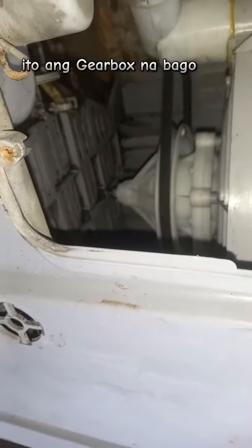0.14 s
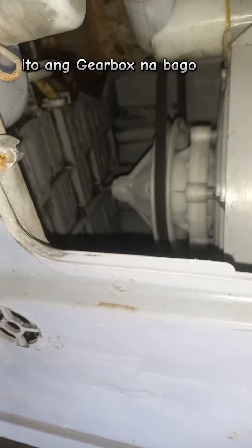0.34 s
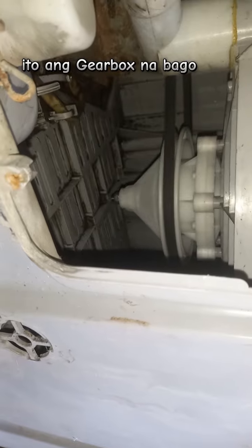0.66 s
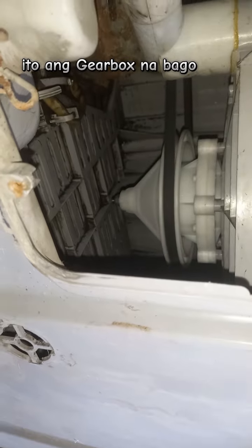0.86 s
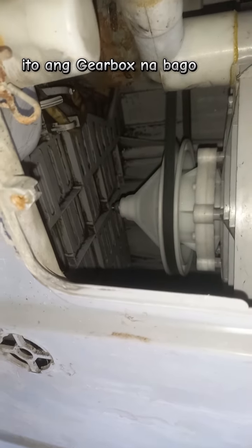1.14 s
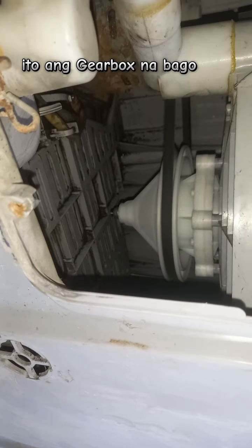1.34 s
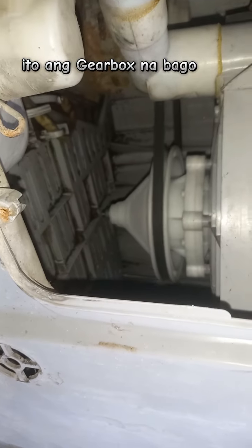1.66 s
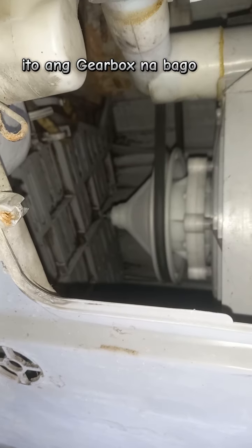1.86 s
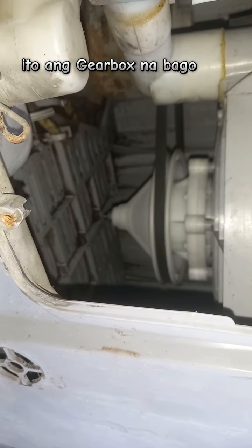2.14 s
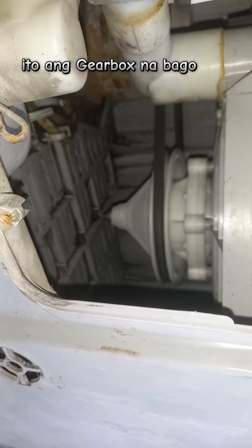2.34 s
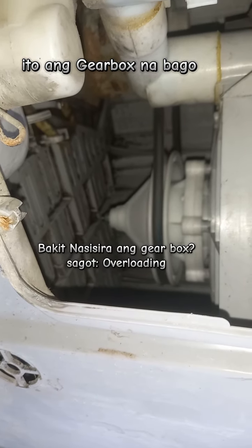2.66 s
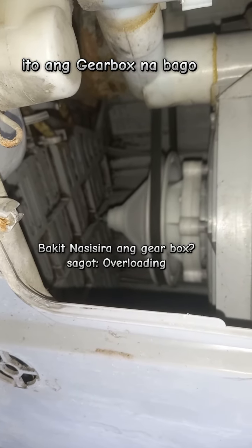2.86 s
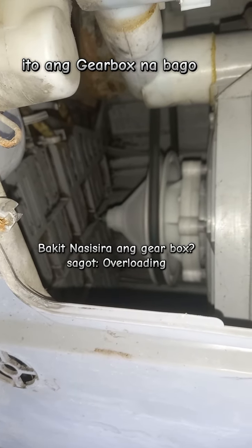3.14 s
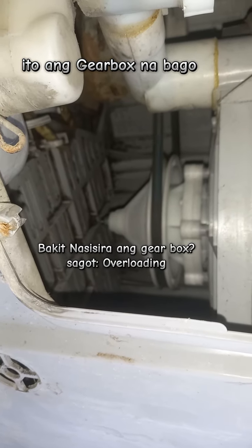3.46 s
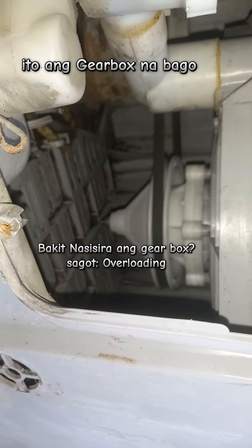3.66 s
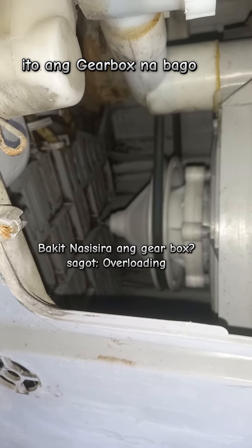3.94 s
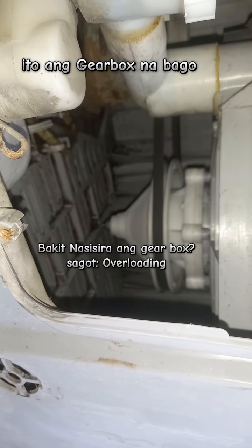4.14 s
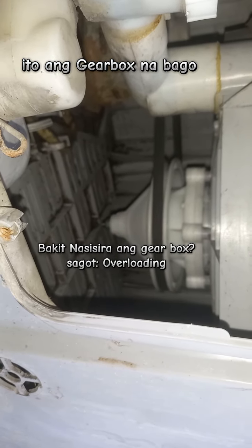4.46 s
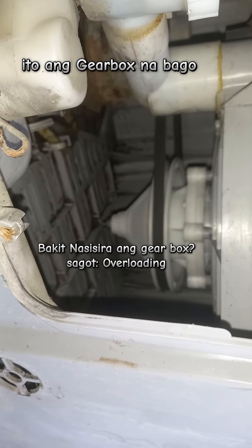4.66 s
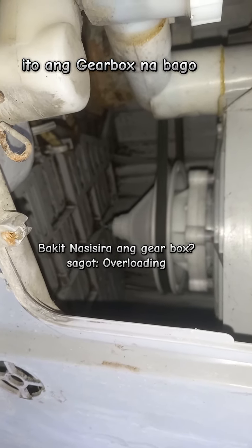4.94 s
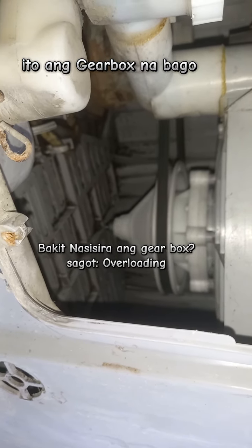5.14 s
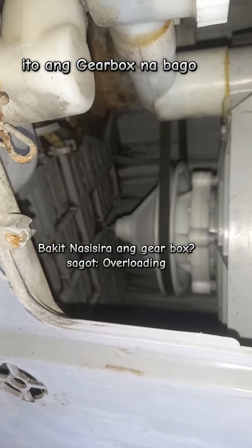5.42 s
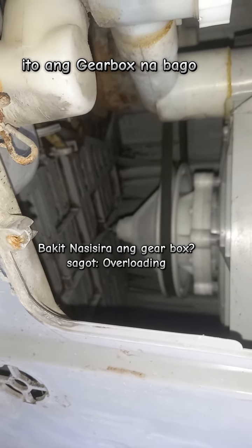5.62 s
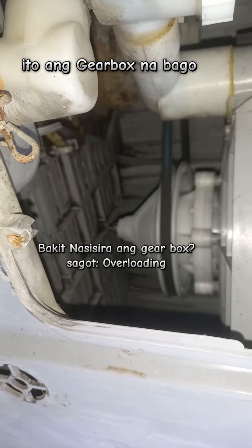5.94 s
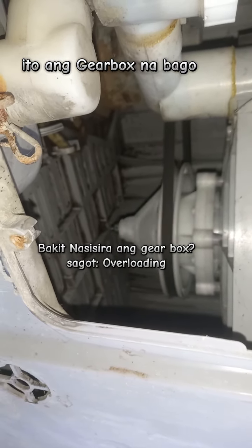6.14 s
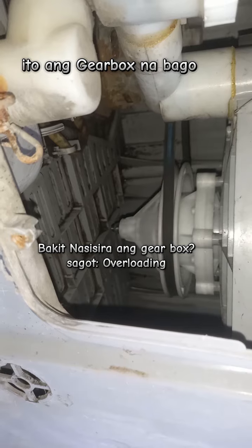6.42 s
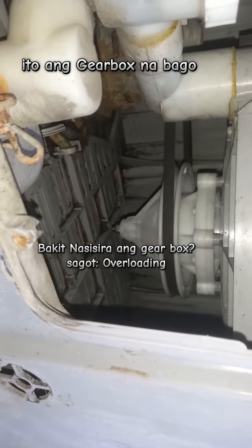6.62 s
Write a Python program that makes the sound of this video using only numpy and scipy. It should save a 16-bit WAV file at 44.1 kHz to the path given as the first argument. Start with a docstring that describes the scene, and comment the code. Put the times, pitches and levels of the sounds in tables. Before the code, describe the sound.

Close to the open motor bay of a twin-tub washer. From 0 to 0.7 seconds there is low cabinet rumble, faint settling water and several short, rising gurgles. At about 0.7 a tight cluster of hard, hollow clacks and a low thump engages the drive. The motor surges loudest near 0.9, then holds a deep hum around 120 hertz, with a rapid flutter, metallic frame buzz and a thin high whine. Water churns densely with bright hiss, small spits and occasional gurgles, notably at 0.9, 3.1, 3.5, 3.9 and 5.3. The stroke stays steady with slight swells until roughly 5.4, when a short squeak marks release and the hum drops away by 5.6. Water subsides into darker, quiet trickling over soft low rumble, with faint gurgles and small gritty squeaks around 5.9 and 6.4, ending near 6.8.

```python
"""Low cabinet rumble, a little water and stray gurgles open a twin-tub washer heard close to its motor bay.
The motor clacks in, hums at twice the mains rate with a beat once per turn, and buzzes in its frame.
Water churns, hisses and gurgles through one stroke, then settles under fading squeaks as the motor stops.
Hum and whine are drifting tones, clacks and buzz excite resonances, and rumble and water are patchy noise."""
import sys
import numpy as np
from scipy import signal
from scipy.fft import rfft, irfft, next_fast_len
from scipy.io import wavfile
from scipy.ndimage import uniform_filter1d

SR = 44100
rng = np.random.default_rng(int(sys.argv[2]) if len(sys.argv) > 2 else 0)


def transcribe(u):
    """Save the signal u as a 16-bit wav file named by the first command-line argument.

    u: samples, shape (n,) or (channels, n), limited to [-1, 1]; the rate is SR.
    q: integer samples, one column per channel.
    """
    v = np.clip(np.atleast_2d(u).T, -1, 1)
    q = np.round(v * 32767).astype(np.int16)
    wavfile.write(sys.argv[1], SR, q)


N = 299439

# Motor through the stroke: (time [s], hum level [dB], frame buzz level [dB], whine level [dB])
MOTOR_LEVELS = [(.65, -70, -77, -85), (.7, -15, -77, -85), (.712, -21, -24.5, -70), (.76, -14, -36, -46),
                (.88, -9, -33, -60), (1.12, -14.5, -33, -51.5), (1.32, -13, -33.5, -58),
                (1.45, -13.5, -31.5, -58), (1.87, -16.5, -35.5, -53), (2.04, -17, -28.5, -53.5),
                (2.27, -16.5, -34.5, -48.5), (2.4, -17.5, -30.5, -50.5), (2.95, -15, -28, -51),
                (3.15, -14.5, -31.5, -50), (4.1, -14.5, -31.5, -52), (4.5, -13.5, -28, -49),
                (4.76, -16.5, -35, -51), (5.2, -13, -29, -53), (5.4, -15.5, -33.5, -51),
                (5.45, -33, -28, -48), (5.5, -29, -48, -90), (5.58, -65, -77, -90)]
# Tub through the stroke: (time [s], cabinet rumble level [dB], churn level [dB], spray hiss level [dB])
TUB_LEVELS = [(0.0, -17, -39.5, -46), (0.05, -15, -35, -50), (.26, -19, -35.5, -49.5),
              (.56, -15.5, -36, -48), (0.64, -17.5, -35.5, -50), (0.69, -13, -36, -46),
              (0.72, -10, -20.5, -46), (0.79, -8, -22, -39), (0.89, -31, -22, -37.5), (0.95, -18, -24, -43),
              (1.06, -21.5, -23.5, -37), (1.46, -18.5, -26.5, -40), (2.72, -18, -24, -38),
              (3.55, -18.5, -23, -36.5), (4.3, -17, -24.5, -38), (5.14, -20.5, -23.5, -37),
              (5.43, -14, -24, -38), (5.52, -20, -28.5, -38.5), (5.79, -28.5, -36, -46),
              (5.98, -27.5, -37, -47.5), (6.26, -33.5, -41.5, -50), (6.33, -30, -42.5, -54),
              (6.49, -29, -42, -54.5), (6.79, -26.5, -38.5, -46.5)]
# Water that the agitator drives: (time [s], share [0-1])
DRIVEN_SHARE = [(.69, 0.034), (.715, 0.96), (5.45, 0.99), (5.9, 0.096)]
# Cabinet rumble colour: (frequency [Hz], relative level [dB per Hz])
RUMBLE_COLOUR = [(29, -60), (50, -38.5), (72, -11.5), (91, -11), (107, -4.5), (119, -7.5), (131, -1),
                 (178, -11), (200, -14), (247, -11.5), (318, -26.5), (360, -23.5), (424, -28), (500, -29.5),
                 (650, -29), (1100, -120)]
# Low room tone colour: (frequency [Hz], relative level [dB per Hz])
ROOM_COLOUR = [(15, -68), (25, -42), (48, -15), (75, 1.5), (91, 11), (113, -1), (200, -11.5), (260, -42),
               (440, -120)]
# Driven water, body: (frequency [Hz], relative level [dB per Hz])
CHURN_COLOUR = [(180, 7), (300, -14), (375, 0.5), (482, -2.5), (817, -1), (969, -4), (1690, -8.5),
                (1870, -10), (2750, -14.5), (3300, -15.5), (3570, -15), (4360, -26), (7000, -29),
                (9100, -109), (15400, -120)]
# Driven water, hiss: (frequency [Hz], relative level [dB per Hz])
SPRAY_COLOUR = [(2350, -13.5), (4000, -4), (4510, -4.5), (6770, -11), (8130, -3.5), (9880, -9.5),
                (12500, -7.5), (15100, -9), (15700, -17)]
# Water left alone, body: (frequency [Hz], relative level [dB per Hz])
SETTLING_COLOUR = [(180, -30), (300, 0.5), (325, -7.5), (445, -2), (515, -6), (644, -2.5), (920, -6),
                   (1600, -11), (2250, -11.5), (3260, -19.5), (7000, -33.5), (9100, -62), (15400, -120)]
# Water left alone, hiss: (frequency [Hz], relative level [dB per Hz])
TRICKLE_COLOUR = [(2350, -2), (4000, -9), (5230, -8), (6810, -10.5), (7900, -3), (9490, -9.5),
                  (13000, -9.5), (15700, -12.5)]
# Likeness of left and right in the noises: (frequency [Hz], likeness [0-1])
STEREO_LIKENESS = [(60, 1), (130, 0.99), (290, 0.83), (640, 0.99), (1400, 0.36), (3100, 0), (7000, 0.24),
                   (15000, 0)]
# Balance of the noises: (frequency [Hz], left over right [dB])
STEREO_BALANCE = [(60, -4.5), (110, 1.5), (200, -1.5), (380, 3.5), (700, 3.5), (1290, 0), (2380, -1),
                  (4400, 5), (8120, -3.5), (15000, -0.5)]
# Phase by which left leads right in the noises: (frequency [Hz], lead [rad])
LEFT_PHASE_LEADS = [(0, 0), (950, 1.5), (1550, 2), (1890, 6), (2240, 6), (2580, 12.5), (3010, 10.5),
                    (3620, 13), (7410, 23.5), (10700, 21.5), (12000, 22.5), (14200, 23.5), (14700, 9),
                    (15400, 22.1)]
# Gurgles in the tub: (time [s], level [dB], starting pitch [Hz])
GURGLE_EVENTS = [(0.082, -17, 536), (0.11, -12, 476), (0.241, -20.5, 527), (0.301, -10.5, 602),
                 (0.667, -15, 715), (0.927, -4, 688), (0.985, -13, 640), (3.149, -10, 775),
                 (3.47, -7.5, 454), (3.905, -12.5, 620), (5.307, -13, 690), (5.532, -13, 514),
                 (5.761, -29, 650), (6.109, -19.5, 980), (6.233, -26.5, 1000), (6.361, -22.5, 830)]
# Timed spits of spray: (time [s], level [dB])
SPIT_EVENTS = [(0.19, -46), (0.4623, -39), (0.66, -28.5), (0.818, -35), (0.8789, -42), (1.7973, -33),
               (1.8721, -34), (2.4882, -39), (3.3109, -37), (3.8102, -35), (4.3924, -32), (4.9477, -35),
               (6.2387, -47), (6.7381, -51)]
# Hum lines: (multiple of the hum [-], motor turns added [-], relative level [dB],
#             left over right [dB], wavering spread [dB], phase wander spread [rad])
HUM_LINES = [(1, 0, 0, 3, 1.5, 0.052), (1, -1, -12.5, 6.5, 3, .15), (1, 1, -10, -2, 1.5, 0.49),
             (2, -1, -17, 14, -1.5, 1.16), (2, 0, -16, -2, 2, 1.05), (2, 1, -21.5, 1.5, 6, 4.26),
             (3, 0, -29.5, 22.5, 1.2, 1.4)]
# Contacts as the drive takes up its slack: (time [s], relative level [dB])
CLACK_BLOWS = [(0.7095, -8), (.724, -16), (0.735, -17)]
# Pulley housing modes: (frequency [Hz], relative level [dB], 60 dB decay [s], left over right [dB])
HOUSING_MODES = [(247, 2, .15, 0), (600, -7, .06, 1), (920, 10, 0.05, 10), (1170, 4.5, 0.033, -2),
                 (1440, -18, 0.047, 0), (2050, -3, 0.018, -16), (3200, -10, 0.035, 7),
                 (3900, -19, 0.022, 0)]
# Motor frame modes: (frequency [Hz], width of one pass [Hz], relative level [dB], left over right [dB])
FRAME_MODES = [(816, 78, 6, 0), (1560, 86, 2, 4), (1858, 74, 4.5, 5), (1908, 69, 7, 1.5),
               (2080, 123, 6, -8), (2214, 74, 1, -20), (2264, 14, -11, -10), (2413, 200, 1.5, 7),
               (2575, 140, -6, 19), (2873, 28, -18.5, 21), (4206, 57, -15, 14)]
# Noise below the whine: (frequency [Hz], width of one pass [Hz], relative level [dB], left over right [dB])
WHINE_SKIRT = [(3535, 31, -4, 24), (3550, 70, -12, 22)]
# Squeaks as the drive lets go and winds down:
# (time [s], level [dB], starting pitch [Hz], 60 dB decay [s], rise time constant [s], roughness [0-1])
SQUEAK_EVENTS = [(5.438, -21, 2090, .12, .006, .25), (5.93, -36, 2800, .1, .006, .95),
                 (6.13, -47, 4110, .2, .01, .1), (6.424, -31, 2290, .2, .012, .5),
                 (6.425, -37, 1850, .12, .008, .4), (6.455, -34, 1285, .2, .015, .2)]

RIGHT_LAG = 11      # samples
HUM_HZ, TURNS_HZ, PULLEY_HZ = 120.3, 29.51, 8.3
THROB_S, WHINE_SWELL_S, PULLEY_S = 3.0058, 2.9956, 3.027    # moments at which each regular swell peaks
KNOCK_S = 2.987     # a moment at which the once-a-turn knock falls
PULLEY_DB, PULLEY_FROM_S, PULLEY_GROWS_S = 1.5, 1.3, 0.58   # pulley swell, fading in over its growth time
START_THROB_DB = -5     # side lines at the start, before the motor is up to speed
BUZZ_WAVER_DB, BUZZ_WAVER_HZ = 1, 12.2
WHINE_HZ = 3563
ROOM_DB = -33
FAINT_TONE_HZ, FAINT_TONE_WIDTH_HZ, FAINT_TONE_DB = 447, 4.7, -52.5     # width of the resonator
GURGLE_T60_S, GURGLE_RISE_S, GURGLE_ROUGH = 0.055, 0.0019, 0.32
SPIT_T60_S, SMALL_SPITS_PER_S, SMALL_SPIT_DB = 0.061, 3.0, -35      # rate when fully driven, middle level
CUTOFF_HZ = 15830


def from_db(db):
    """Turns a level in dB into a gain."""
    return 10 ** (np.asarray(db) / 20)


def rms_one(x):
    """Scales a sound to rms 1."""
    return x / np.sqrt(np.mean(x ** 2) + 1e-20)


def in_time(rows):
    """Reads each column of a time curve at every sample."""
    times, *columns = np.transpose(rows)
    return [np.interp(np.arange(N) / SR, times, column) for column in columns]


def at_hz(points, hz):
    """Reads a spectrum along a logarithmic frequency axis."""
    point_hz, values = np.array(points).T
    return np.interp(np.log(hz), np.log(point_hz), values)


def drift(rate):
    """Slow chance movement of spread 1, from noise through two low-pass poles at rate [Hz]."""
    pole = np.exp(-80 * np.pi * rate / SR)      # one step every 40 samples
    noise = rng.standard_normal(N // 40 + 2002)
    slow = signal.lfilter([1], [1, -2 * pole, pole * pole], noise)[2000:]
    return np.interp(np.arange(N) / 40, np.arange(len(slow)), rms_one(slow))


def stereo(x, pan_db, lag=RIGHT_LAG):
    """Pans a sound and lets it reach the left side first."""
    return np.array([x, np.roll(x, lag)]) * from_db([[pan_db / 2], [-pan_db / 2]])


def fade(clicks, t60):
    """Each click starts an exponential decay."""
    return signal.lfilter([1], [1, -from_db(-60 / (t60 * SR))], clicks)


def ring(clicks, hz, t60):
    """Each click starts a decaying sine, scaled by the click."""
    radius, angle = from_db(-60 / (t60 * SR)), 2 * np.pi * hz / SR
    poles = [1, -2 * radius * np.cos(angle), radius * radius]
    return signal.lfilter([0, np.sin(angle)], poles, clicks + 1e-18)


def resonate(x, hz, width_hz):
    """Passes twice through one resonance, so the valleys beside it stay deep; rms 1."""
    t60 = np.log(1000) / (np.pi * width_hz)
    once = ring(x, hz, t60)
    return rms_one(ring(once, hz, t60))


def ringing_metal(modes, touches, alike):
    """Touches of random strength ring all modes at once, partly differently left and right; rms 1."""
    out, alike = 0, np.clip(alike, 0, 1)
    near, far = touches * rng.standard_normal((2, N))
    for hz, width_hz, db, pan_db in modes:
        left = resonate(near, hz, width_hz)
        right = alike * left + np.sqrt(1 - alike ** 2) * resonate(far, hz, width_hz)
        out = out + np.array([left, right]) * from_db([[db + pan_db / 2], [db - pan_db / 2]])
    return rms_one(out)


def patchy_noise(spectrum, together_db, own_db, rate):
    """Coloured stereo noise in half-octave bands that swell together and each alone; rms 1."""
    size = next_fast_len(N)
    hz = np.maximum(np.arange(size // 2 + 1) * SR / size, 1)
    mid, apart = rfft(rng.standard_normal((2, size)))
    alike = np.clip(at_hz(STEREO_LIKENESS, hz), 0, 1)
    right = alike * mid + np.sqrt(1 - alike ** 2) * apart
    right = right * np.exp(-1j * np.interp(hz, *np.transpose(LEFT_PHASE_LEADS)))
    balance_db = at_hz(STEREO_BALANCE, hz) / 2 * [[1], [-1]]
    pair = np.array([mid, right]) * from_db(at_hz(spectrum, hz) + balance_db)
    lowest_hz, highest_hz = spectrum[0][0], spectrum[-1][0]
    half_octaves = 2 * np.log2(hz / lowest_hz)
    out = 0
    for k in range(int(2 * np.log2(highest_hz / lowest_hz)) + 2):
        overlap = np.clip(1 - abs(half_octaves - k), 0, 1)      # triangular crossfade between bands
        band = irfft(pair * overlap, size)[:, :N]
        out = out + band * from_db(together_db + own_db * drift(rate))
    return rms_one(out)


def surges(per_s, rise_s, decay_s):
    """Quick swells at random moments that fade more slowly; mean 0, spread 1."""
    swell = (rng.random(N) < per_s / SR) * rng.uniform(0.057, 1, N)
    for lag_s in (rise_s, decay_s):
        swell = signal.lfilter([1], [1, -np.exp(-1 / (lag_s * SR))], swell)
    return rms_one(swell - swell.mean())


def blips(events):
    """Each rings briefly and rises a little in pitch; rough ones smear into a band of noise."""
    out, t = np.zeros(N + SR), np.arange(SR // 4) / SR
    grit = rms_one(uniform_filter1d(rng.standard_normal((len(events), len(t))), size=60))
    for (s, db, hz, t60, rise, rough), noise in zip(events, grit):
        shape = (1 - np.exp(-t / rise)) * from_db(db - 60 * t / t60)
        shape = shape * (1 - rough + rough * noise)
        start = round(s * SR)
        out[start:start + len(t)] += shape * np.sin(2 * np.pi * hz * t * (1 + .12 * t))
    return out[:N]


def cabinet_rumble(level_db):
    """The cabinet rumbles as low noise whose bands sway together and apart."""
    noise = patchy_noise(RUMBLE_COLOUR, together_db=1.37 * drift(19.4), own_db=1.6, rate=5.2)
    return from_db(level_db) * noise


def room_tone():
    """Low noise lies under everything, each band swaying alone."""
    return from_db(ROOM_DB) * patchy_noise(ROOM_COLOUR, together_db=0, own_db=2.5, rate=4.2)


def faint_tone():
    """Noise through a narrow resonance makes a thin wavering tone that shows in the pauses."""
    tone = resonate(rng.standard_normal(N), FAINT_TONE_HZ, FAINT_TONE_WIDTH_HZ)
    return stereo(from_db(FAINT_TONE_DB) * tone, 3.0)


def water(churn_db, spray_db):
    """Driven water churns and sprays; left alone it settles with a darker colour."""
    driven = np.clip(in_time(DRIVEN_SHARE)[0], 0, 1)
    loud, calm = np.sqrt(driven), np.sqrt(1 - driven)
    slosh = surges(per_s=22., rise_s=0.0064, decay_s=0.01)      # each slap swells churn and spray at once
    churn = loud * patchy_noise(CHURN_COLOUR, together_db=0.65 * slosh, own_db=1.2, rate=9.3)
    churn = churn + calm * patchy_noise(SETTLING_COLOUR, together_db=0.49 * slosh, own_db=3.0, rate=39.0)
    spray = loud * patchy_noise(SPRAY_COLOUR, together_db=0.91 * slosh, own_db=0.85, rate=16.0)
    spray = spray + calm * patchy_noise(TRICKLE_COLOUR, together_db=0.56 * slosh, own_db=2.3, rate=13.0)
    return from_db(churn_db) * churn + from_db(spray_db) * spray


def gurgles():
    """Gurgles in the tub are short, slightly rough tones that rise in pitch."""
    events = [(*row, GURGLE_T60_S, GURGLE_RISE_S, GURGLE_ROUGH) for row in GURGLE_EVENTS]
    return stereo(blips(events), 2.5)


def spits():
    """Spits of spray are bright puffs of noise that die fast; small ones come at random in driven water."""
    driven = np.clip(in_time(DRIVEN_SHARE)[0], 0, 1)
    puffs = (rng.random(N) < SMALL_SPITS_PER_S / SR) * driven
    puffs = puffs * from_db(SMALL_SPIT_DB + 2.5 * rng.standard_normal(N))
    puffs[[round(s * SR) for s, db in SPIT_EVENTS]] = from_db(np.array(SPIT_EVENTS)[:, 1])
    shape = fade(puffs + 1e-18, SPIT_T60_S)
    bright = signal.butter(2, 6000, "high", fs=SR, output="sos")
    return signal.sosfilt(bright, shape * rng.standard_normal((2, N)))


def hum(level_db):
    """Magnetic pull at twice the mains rate; the uneven rotor adds side lines, the pulley a slow swell."""
    t, out = np.arange(N) / SR, 0
    up_to_speed = np.clip((t - PULLEY_FROM_S) / PULLEY_GROWS_S, 0, 1)
    pulley_db = PULLEY_DB * up_to_speed * np.cos(2 * np.pi * PULLEY_HZ * (t - PULLEY_S))
    side_db = START_THROB_DB * (1 - up_to_speed)
    for times, turns, db, pan_db, waver_db, wander in HUM_LINES:
        cycles = np.rint(times) * HUM_HZ * t + np.rint(turns) * TURNS_HZ * (t - THROB_S)
        line = np.sqrt(2) * np.cos(2 * np.pi * cycles + wander * drift(3.8))
        swell_db = pulley_db if np.rint(turns) == 0 else side_db
        swell_db = swell_db + waver_db * drift(8.6)
        out = out + stereo(line * from_db(level_db + db + swell_db), pan_db)
    return out


def clacks():
    """Every contact strikes all modes of the pulley housing and shakes loose a dying rattle."""
    blows, out = np.zeros(N), 0
    blows[[round(s * SR) for s, db in CLACK_BLOWS]] = from_db(np.array(CLACK_BLOWS)[:, 1])
    for hz, level_db, t60, pan_db in HOUSING_MODES:
        out = out + stereo(ring(blows * from_db(level_db - 9.0), hz, t60), pan_db)
    body = signal.butter(1, [600, 2500], "band", fs=SR, output="sos")
    rattle = signal.sosfilt(body, fade(blows, .12) * rng.standard_normal((2, N)))
    crossfeed = 0.23 * rattle[::-1]     # some of each side leaks into the other
    return out + from_db(-22.0) * (rattle + crossfeed)


def buzz(level_db, per_s, pull, knock, knock_s, uneven_db):
    """Loose parts chatter with the pull; a knock each turn sets off a burst, every second one mostly harder."""
    t = np.arange(N) / SR
    level_db = level_db + BUZZ_WAVER_DB * drift(BUZZ_WAVER_HZ)
    turns = (t - KNOCK_S) * TURNS_HZ
    which = np.floor(turns).astype(int) % 200
    strength = from_db(uneven_db * (np.arange(200) % 2 + rng.standard_normal(200)))[which]
    burst = 1 + knock * strength * np.exp(-(turns % 1) / (TURNS_HZ * knock_s))
    chatter = 1 + pull * np.sin(2 * np.pi * HUM_HZ * t)
    touches = (rng.random(N) < per_s / SR) * chatter * burst
    return from_db(level_db) * ringing_metal(FRAME_MODES, touches, alike=0.61)


def whine(level_db, wobble, sway_hz, skirt_db):
    """A thin high whine, probably the bearing: its pitch sways, it swells once a turn and trails noise below."""
    t = np.arange(N) / SR
    turn = 1 + wobble * np.cos(2 * np.pi * TURNS_HZ * (t - WHINE_SWELL_S))
    pitch = WHINE_HZ + sway_hz * drift(24.0)
    tone = np.sqrt(2) * np.sin(2 * np.pi * np.cumsum(pitch) / SR)
    tone = tone * from_db(2.2 * drift(13.0))
    skirt = from_db(skirt_db) * ringing_metal(WHINE_SKIRT, np.ones(N), alike=.15)
    return from_db(level_db) * turn * (stereo(tone, 22.0) + skirt)


def squeaks():
    """The drive squeaks in short smooth or gritty tones as it lets go and winds down."""
    return stereo(blips(SQUEAK_EVENTS), -2.0, lag=0)


def scene():
    """Layers tub, room and motor."""
    hum_db, buzz_db, whine_db = in_time(MOTOR_LEVELS)
    rumble_db, churn_db, spray_db = in_time(TUB_LEVELS)
    background = cabinet_rumble(rumble_db) + room_tone() + faint_tone()
    tub = water(churn_db, spray_db) + gurgles() + spits()
    motor = hum(hum_db) + clacks()
    motor = motor + buzz(buzz_db, per_s=3500., pull=0.8, knock=1.8, knock_s=.009, uneven_db=1.0)
    motor = motor + whine(whine_db, wobble=0.46, sway_hz=10.7, skirt_db=1.0)
    return background + tub + motor + squeaks()


def record(dry):
    """Soft saturation rounds the peaks, then a steep low-pass cuts the top."""
    rounded = 1.353 * np.tanh(dry / 1.298)
    low_pass = signal.ellip(12, .5, 70, CUTOFF_HZ, fs=SR, output="sos")
    return signal.sosfilt(low_pass, rounded)


dry = scene()
out = record(dry)
transcribe(out)
```